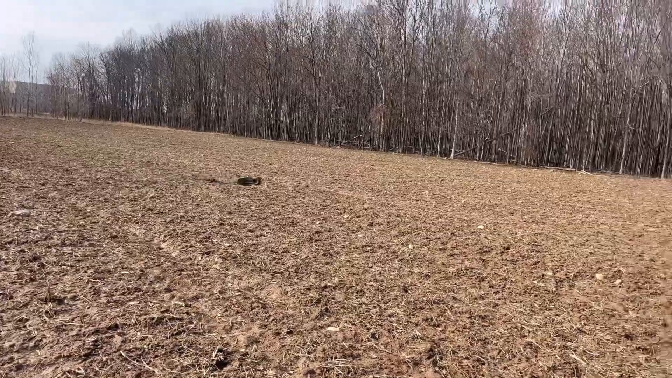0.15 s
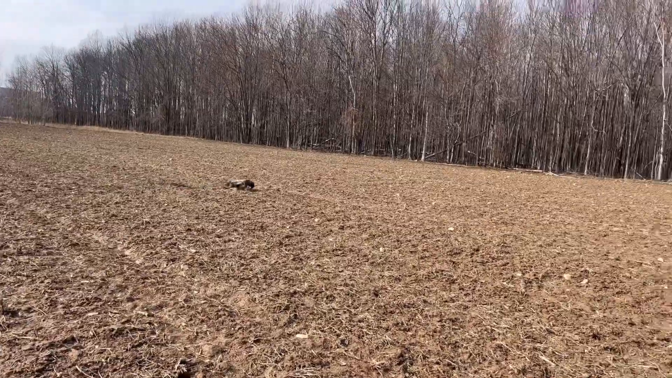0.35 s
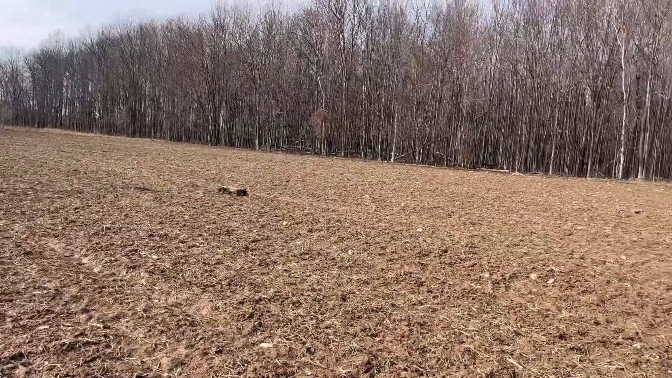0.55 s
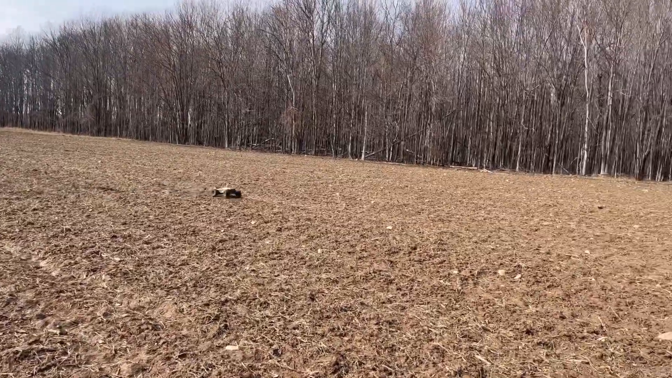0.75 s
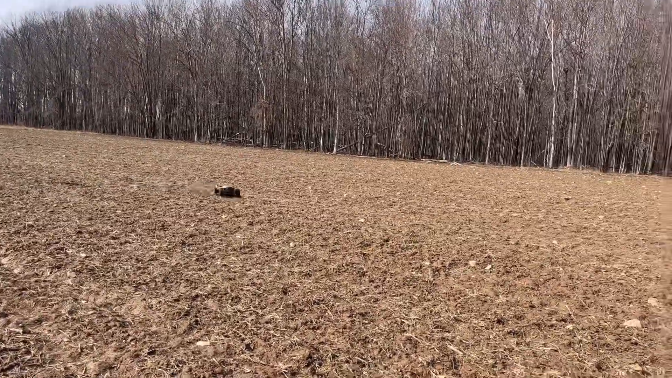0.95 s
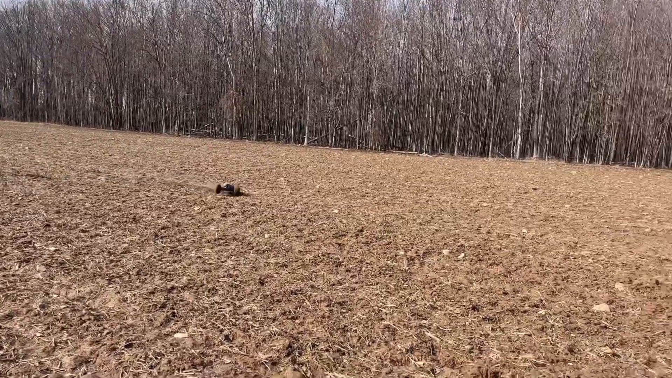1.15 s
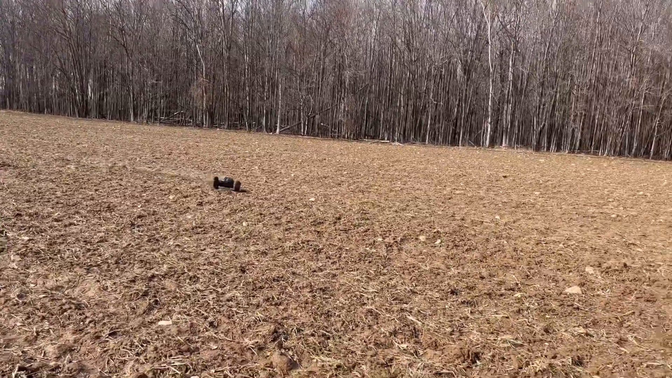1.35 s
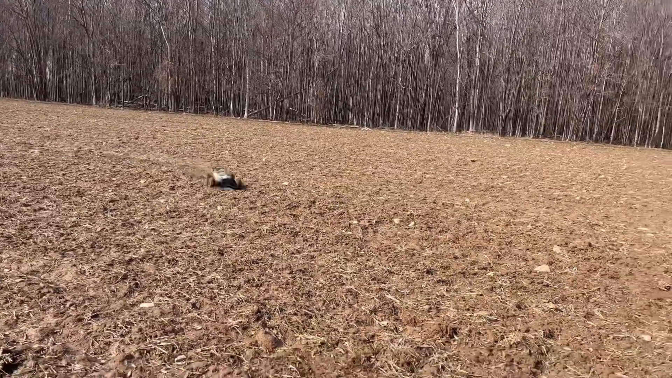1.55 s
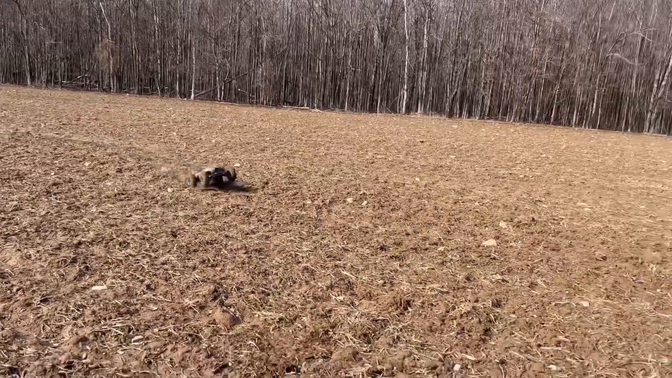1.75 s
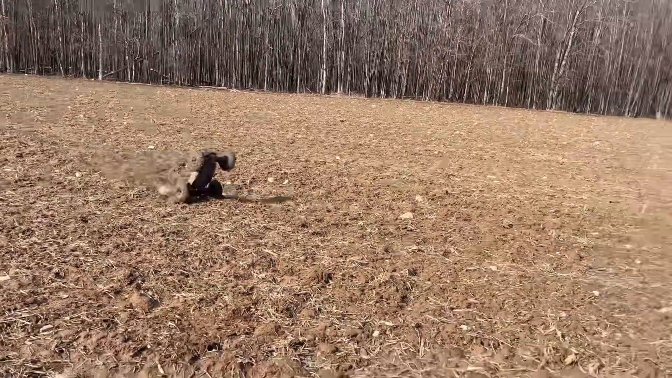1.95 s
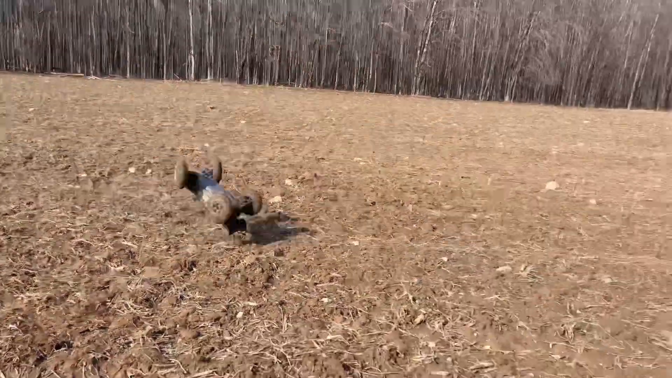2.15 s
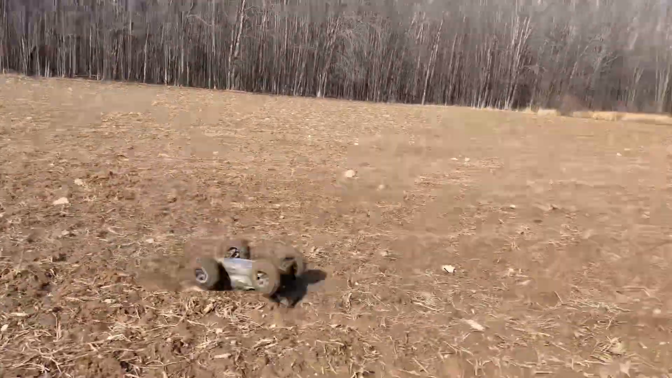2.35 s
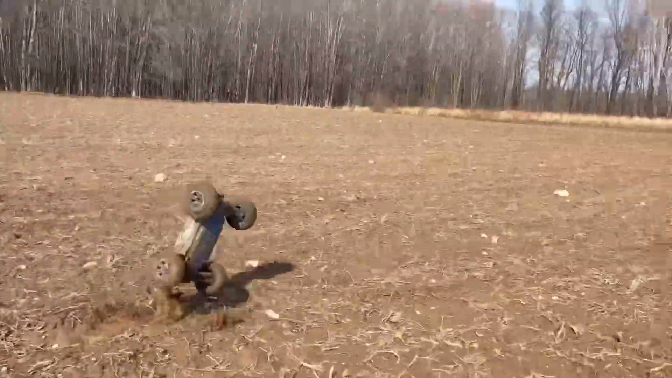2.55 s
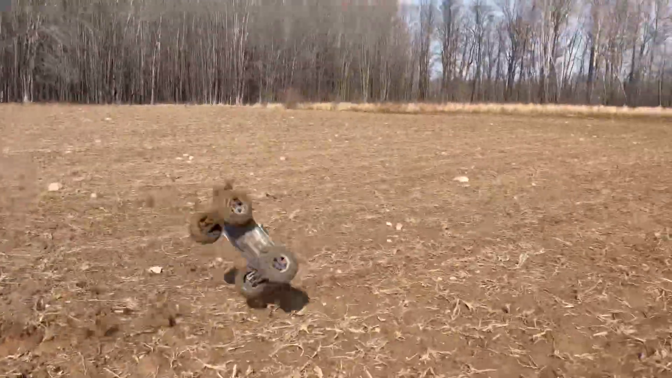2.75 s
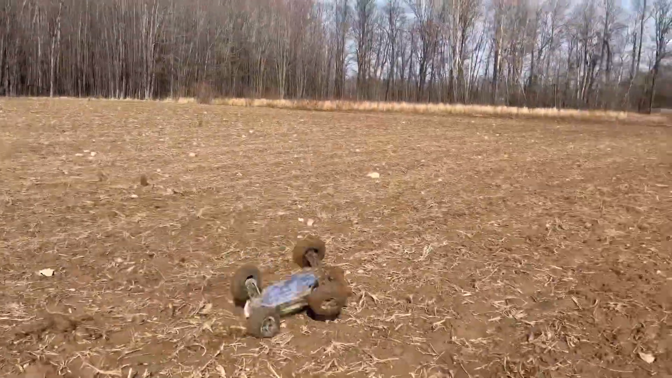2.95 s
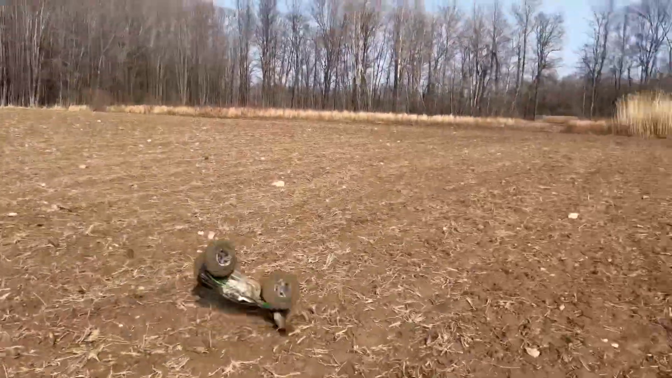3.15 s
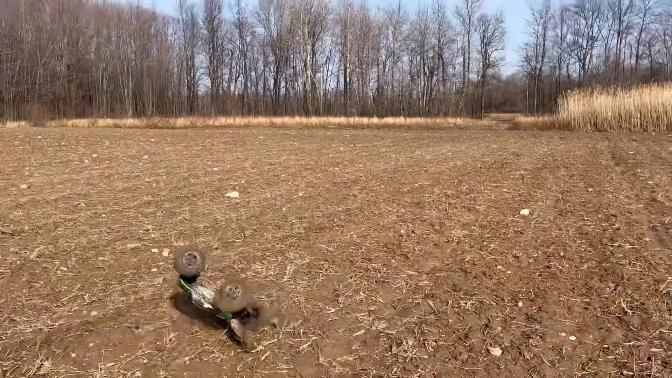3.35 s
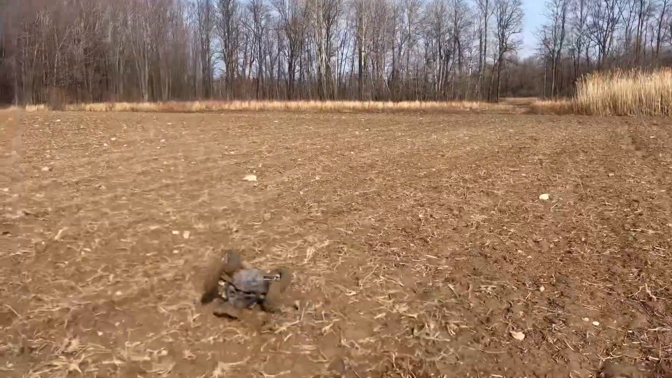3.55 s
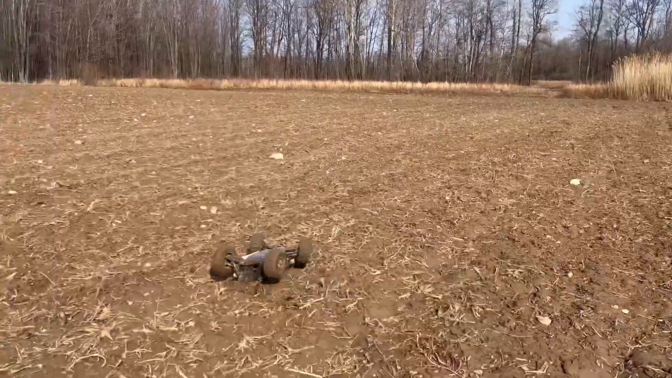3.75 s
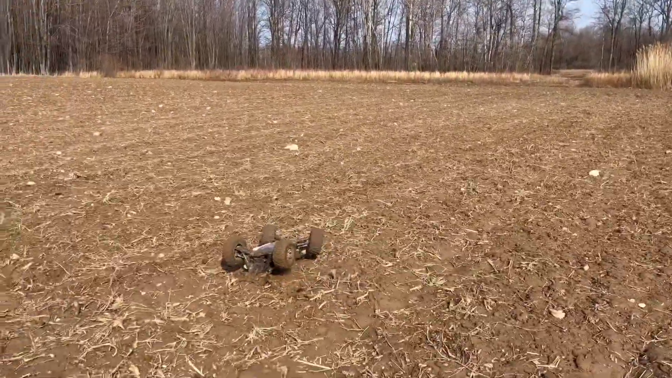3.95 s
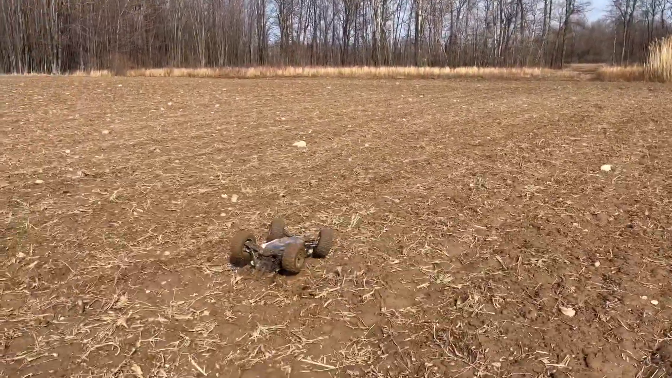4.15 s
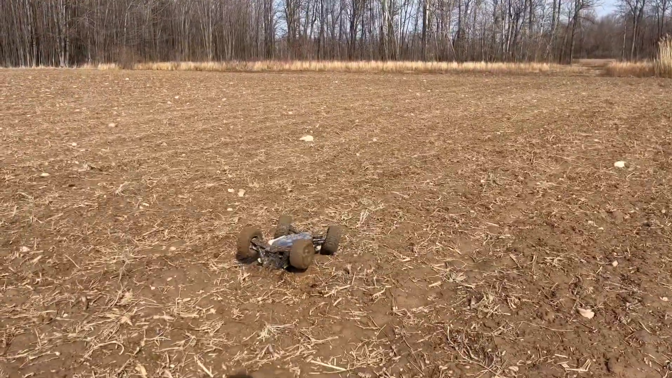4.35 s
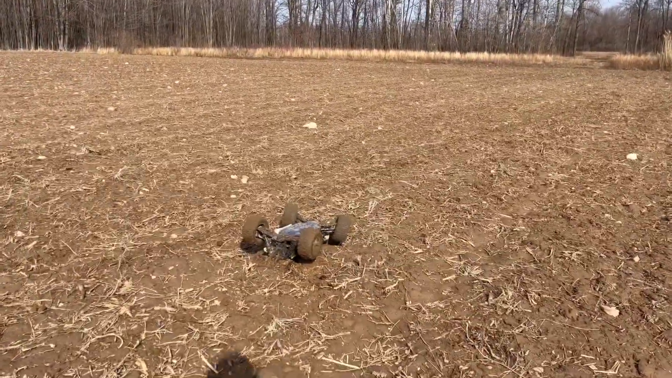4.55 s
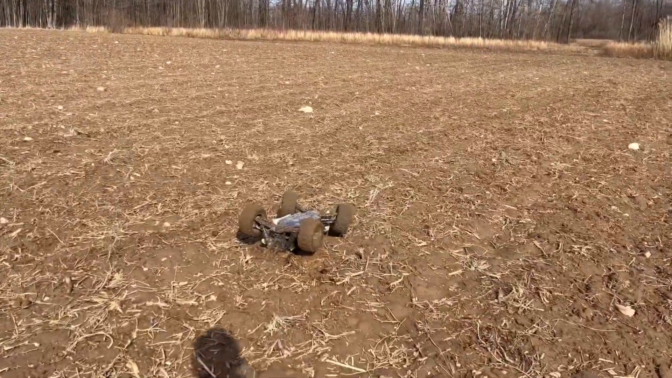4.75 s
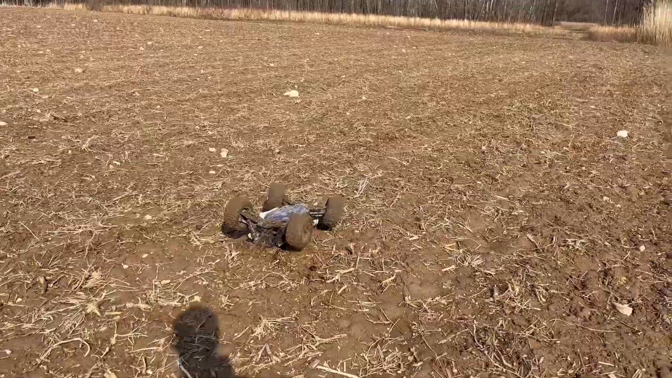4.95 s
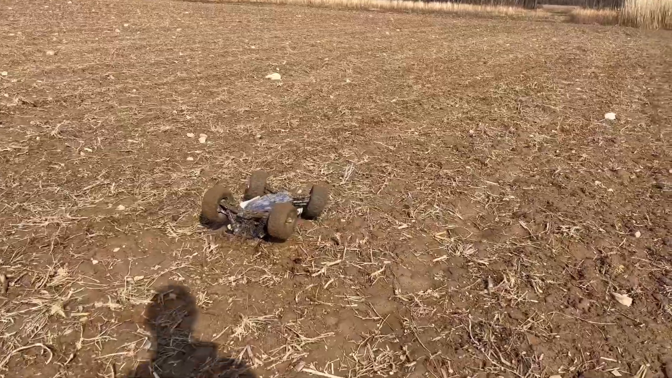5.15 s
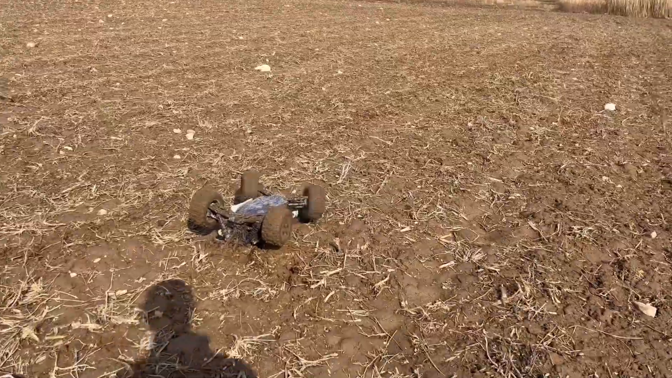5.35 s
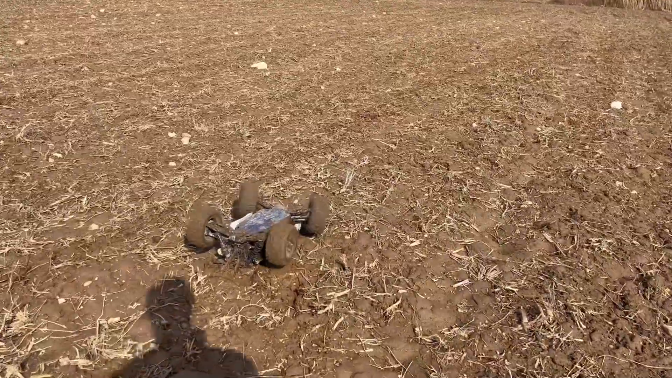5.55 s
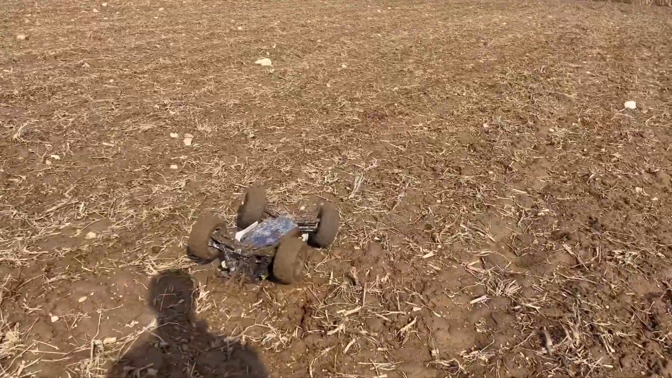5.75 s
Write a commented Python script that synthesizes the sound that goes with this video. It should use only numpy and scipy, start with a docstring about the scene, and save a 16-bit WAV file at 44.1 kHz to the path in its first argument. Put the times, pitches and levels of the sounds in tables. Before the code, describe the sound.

A radio-controlled truck whines closer over dirt, tumbles with crunching thuds, then its wheels rattle and spin down before one last throttle blip.

```python
"""A rising gear whine races closer: a radio-controlled truck crosses a ploughed field, tumbles with
crunching thuds and lands with its wheels spinning, then gets one last blip of throttle.
The whine is the gear mesh following the motor; the rotor hums and the drivetrain rattles the chassis.
Tyres churn and spray soil, grit pings off metal, dry stalks snap and light wind brushes the microphone."""
import sys
import numpy as np
from scipy import signal
from scipy.fft import rfft, irfft
from scipy.io import wavfile
from scipy.ndimage import uniform_filter1d, map_coordinates

SR = 44100
rng = np.random.default_rng(int(sys.argv[2]) if len(sys.argv) > 2 else 0)


def int16_out(signal):
    """Quantize to a 16-bit WAV file."""
    q = np.round(np.clip(np.atleast_2d(signal).T, -1, 1) * 32767)
    wavfile.write(sys.argv[1], SR, q.astype(np.int16))


N = 260190
T = np.arange(N) / SR
BINS = np.fft.rfftfreq(N, 1 / SR)
CRUISE_HZ = 5000  # gear mesh rate at cruising speed

# motor speed through each throttle pull, squeeze to release: one list per pull of (t/s, mesh f/Hz)
PULL_REVS = [
    [(0, 2700), (.025, 2850), (.075, 2300)],
    [(.268, 1550), (.31, 1970), (.345, 2570), (.38, 2730), (.445, 2000)],
    [(.605, 1620), (.65, 2030), (.695, 2020), (.745, 2540)],
    [(.765, 2720), (.84, 2820), (1.17, 4250), (1.27, 5530), (1.375, 6300), (1.42, 5600)],
    [(1.65, 4100), (1.73, 5250), (1.93, 6770), (2.02, 6770)],
    [(2.875, 4400), (2.925, 5380), (2.99, 5110), (3.165, 7250)],
    [(5.343, 850), (5.365, 1200), (5.39, 1720), (5.4, 2420), (5.432, 2300)],
]
# the mix in each pull: whine level/dB, rattle boost/dB, spray boost/dB, churn boost/dB
PULL_MIX = [(-26.5, -2, 14.5, 0.5), (-25, 0, 11.5, 1.5), (-29, 3, 13.5, 2.5), (-24, 1, 11.5, 4),
            (-26.5, 0, 6.5, -0.5), (-27, 4, 4, -1.5), (-26.5, 8, 19, 20)]
# run-downs off the throttle: start/s, end/s, from f/Hz, to f/Hz, bend (over 1 brakes late), hum level/dB
COASTS = [(0.145, 0.24, 1237, 1104, 0.89, -62), (0.491, 0.579, 1314, 1204, 1.36, -60),
          (1.483, 1.628, 3690, 3259, 1.16, -60), (2.053, 2.304, 6360, 5940, 2.17, -20.5),
          (2.604, 2.811, 7257, 6640, 0.93, -24), (3.168, 3.326, 6900, 2914, 2.4, -16.5),
          (3.7, 5.301, 2597, 606.8, 2.15, -64), (5.465, 5.811, 4420, 3857, 1.5, -44)]
# bright, dry hiss of soil and stalks: f/Hz, level/dB
DRY_HISS_EQ = [(1000, -22), (3000, -8), (5000, -5), (7000, -5), (8500, -8), (10500, 0), (13000, 0),
               (14500, 1), (15500, -12)]


def amp(db):
    """Decibels to gain."""
    return 10 ** (np.asarray(db) / 20)


def unit(x):
    """Scales to rms 1."""
    return x / np.sqrt(np.mean(x ** 2) + 1e-20)


def curve(points):
    """Draws (t/s, value) breakpoints at every sample."""
    return np.interp(T, *np.transpose(points))


def across(rows):
    """The columns of a frequency table, at every bin."""
    hz, *columns = np.transpose(rows)
    return [np.interp(np.log(BINS + 1), np.log(hz), c) for c in columns]


def colour(x, eq):
    """Filters through an EQ curve of (f/Hz, level/dB)."""
    return irfft(rfft(x) * amp(across(eq)[0]), N)


def resonance(hz, width_hz):
    """Frequency response of one ringing mode."""
    return 1 / (1 + 1j * (BINS ** 2 - hz ** 2) / (width_hz * BINS + 1e-9))


def wander(rate_hz):
    """Smooth random modulation of rms 1, rolling off above the rate."""
    return unit(irfft(rfft(rng.standard_normal(N)) / (1 + (BINS / rate_hz) ** 4), N))


def grains(per_s, spread_db):
    """Random clicks of uneven size."""
    size = amp(spread_db * np.minimum(rng.exponential(1, N), 4))
    return unit(size * rng.standard_normal(N) * (rng.random(N) < per_s / SR))


def held(start, end, attack_s, release_s):
    """An envelope 0-1: opens around start, holds, and dies away after end."""
    return np.clip((T - start) / attack_s + .5, 0, 1) * np.exp(-np.maximum(T - end, 0) / release_s)


def swell(centre_s, half_s):
    """A bell-shaped envelope 0-1."""
    return np.exp(-((T - centre_s) / half_s) ** 2)


def clumped(x, depth_db, span_hz, span_s):
    """Each clod sounds its own patch of pitches for a moment."""
    spectrogram = signal.stft(x, nperseg=512)[2]
    f, t = np.meshgrid(*map(np.fft.fftfreq, spectrogram.shape), indexing="ij")
    blur = np.exp(-(f * span_hz * 512 / SR) ** 2 - (t * span_s * SR / 256) ** 2)
    patches = unit(np.fft.ifft2(np.fft.fft2(rng.standard_normal(spectrogram.shape)) * blur).real)
    return unit(signal.istft(spectrogram * amp(depth_db * np.clip(patches, -2, 2)))[1][:N])


def flexed(x):
    """Bending plastic and rubber shift their resonances up and down by a few percent."""
    lag_s = .0007 * wander(rate_hz=12)
    return map_coordinates(x, [(T + lag_s) * SR], mode="mirror")


def throttle(sizes, release_s=0.0089):
    """Holds one value per pull while the trigger is squeezed."""
    return sum(size * held(rev[0][0], rev[-1][0], attack_s=.035, release_s=release_s)
               for size, rev in zip(sizes, PULL_REVS))


def motor_hz():
    """The gear mesh rate: driven in each pull, running down in each coast."""
    points = [point for rev in PULL_REVS for point in rev]
    progress = np.linspace(0, 1, num=8)
    for start, end, high, low, bend, _ in COASTS:
        points += zip(start + progress * (end - start), high + (low - high) * progress ** bend)
    return curve(sorted(points))


def ground():
    """How hard the tyres dig: 0 in the air, about 1 in the soil."""
    # tyres on the soil: touch/s, leave/s, dig
    contacts = [(-.1, 2.07, 1.197), (2.119, 2.64, 0.59), (1.269, 1.12, 1.14), (2.317, 2.604, 0.7),
                (2.901, 3.395, 1.037), (3.499, 3.515, 1.05)]
    digs = [dig * held(touch, leave, attack_s=.04, release_s=.17) for touch, leave, dig in contacts]
    return np.max(digs, axis=0)


def nearness(unity_m=3):
    """Sound pressure falls as one over the distance."""
    # the truck's approach: t/s, distance/m
    path = [(0, 17), (1, 19.5), (1.6, 9.22), (2, 3.77), (2.3, 2.86), (2.8, 4.5), (2.94, 1.47), (3.17, 2.46),
            (3.55, 1.57), (4, 2.7), (5.2, 2.74), (5.9, 2.27)]
    return unity_m / curve(path)


def rolling_gain(pull_db, free_db, octave_db, ground_db):
    """A rolling part grows louder with each octave of speed, ground contact, throttle and nearness."""
    speed_db = octave_db * np.log2(motor_hz() / CRUISE_HZ)
    return nearness() * amp(free_db + speed_db + ground_db * ground() + throttle(pull_db))


def wind(calm_db=-42):
    """Lumpy wind on the microphone, swelling in short gusts."""
    # gusts: t/s, half length/s, level/dB
    gusts = [(0.37, 0.088, -36), (0.532, 0.017, -31), (0.684, 0.035, -30), (2.093, 0.62, -34.5),
             (2.195, 0.025, -21.5), (3.026, 0.056, -27), (3.305, 0.36, -35)]
    # low wind rumble: f/Hz, level/dB
    rumble_eq = [(15, -37), (32, -27), (52, 1.5), (100, 0), (170, -8.5), (400, -18), (2000, -42)]
    level = amp(calm_db) + sum(amp(db) * swell(s, half_s) for s, half_s, db in gusts)
    buffeting = amp(-6 + 2 * wander(rate_hz=6.6))
    return level * buffeting * unit(colour(rng.standard_normal(N), rumble_eq))


def stubble(decay_s=0.0014):
    """Dry stalks snap close by."""
    # snaps: t/s, level/dB
    snaps = [(5.168, -44), (5.209, -33.5)]
    envelope = sum(amp(db) * (T >= s) * np.exp(-abs(T - s) / decay_s) for s, db in snaps)
    return envelope * unit(colour(rng.standard_normal(N), DRY_HISS_EQ))


def pings(t60_s=0.024, attack_s=0.0037):
    """Small stones ring a metal part for a moment, each with a dry scratch."""
    # grit on metal: t/s, relative level/dB, f/Hz
    strikes = [(2.226, -23, 11800), (2.254, -20, 10500), (2.289, -19, 12000), (2.668, -17, 14720),
               (2.8088, -19, 10800), (3.3964, -21.5, 11500), (3.441, -24, 14780), (3.572, -23.5, 11400),
               (4.717, -32, 10040), (3.6706, -21.5, 11240), (3.8036, -28, 10470), (4.0183, -21.5, 11900),
               (4.229, -30.5, 10280), (4.7738, -28, 11440), (5.5751, -22.5, 10300), (5.6371, -20, 9700)]
    out, t = np.zeros(N), np.arange(4096) / SR
    for s, db, hz in strikes:
        envelope = amp(db - 60 * t / t60_s) * (1 - np.exp(-t / attack_s))
        ping = envelope * (np.sin(2 * np.pi * hz * t) + rng.standard_normal(len(t)))
        slot = out[round(s * SR):][:len(t)]
        slot += ping[:len(slot)]
    return amp(5) * out


def spray(bumps):
    """Thrown soil hisses against the body, and fine grit tinkles at many high pitches."""
    soil = grains(per_s=7000, spread_db=1) * amp(1.5 * bumps + 4.4 * wander(rate_hz=50))
    hiss = unit(colour(soil, DRY_HISS_EQ))
    grit_spectrum = sum(rfft(grains(per_s=200, spread_db=2)) / (1 + 1j * (BINS - hz) / 200) ** 2
                        for hz in np.linspace(9500, 14500, num=12))
    tinkle = amp(4.5) * unit(irfft(grit_spectrum, N))
    shower = clumped(hiss + tinkle, depth_db=2, span_hz=1200, span_s=0.04)
    boosts_db = [db for _, _, db, _ in PULL_MIX]
    return shower * rolling_gain(boosts_db, free_db=-45, octave_db=8.2, ground_db=7.53)


def tyres(bumps):
    """Lugs slap clods of soft soil and drum the hollow tyres."""
    # dull churn of the tyres: f/Hz, level/dB
    churn_eq = [(25, -49), (90, -8.5), (160, -2), (270, -1.5), (360, -2.5), (490, 2), (590, -4), (710, -10),
                (860, -6.5), (1100, -13.5), (2500, -16), (8000, -48)]
    slaps = grains(per_s=2500, spread_db=-0.5) * amp(bumps)
    churn = clumped(flexed(colour(slaps, churn_eq)), depth_db=3, span_hz=300, span_s=.035)
    boosts_db = [db for *_, db in PULL_MIX]
    return churn * rolling_gain(boosts_db, free_db=-54, octave_db=7.37, ground_db=28.18)


def chassis(clicks):
    """Clicks ring the plastic chassis and shell; some of each click radiates directly."""
    # chassis and shell modes: f/Hz, width/Hz, level/dB
    modes = [(547, 70, 1), (885, 63, 6), (1267, 88, 7.5), (1617, 110, 2), (2000, 57, 1.5), (2360, 78, 4.5),
             (2870, 870, -1.5), (3880, 110, -4.5)]
    # the direct click: f/Hz, level/dB
    click_eq = [(100, -41), (300, -59), (700, -37), (1100, -27), (2000, -11.5), (4100, -43), (4900, -5),
                (9000, -23), (14000, -17)]
    ring = sum(amp(db) * resonance(hz, width) for hz, width, db in modes)
    return irfft(rfft(clicks) * (ring + amp(across(click_eq)[0])), N)


def axles(per_s, spread_db):
    """Each loose part is knocked at its own moments and rings at its own pitch."""
    # modes of wheels, shafts and gear cases: f/Hz, width/Hz, level/dB
    modes = [(537, 98, 0), (829, 85, 1.5), (949, 54, -1.5), (1305, 84, 7), (1360, 170, -1), (1590, 71, 2.5),
             (1712, 60, 2.5), (2090, 195, -0.5), (2356, 144, -2), (2764, 136, 1), (3136, 140, -2),
             (3724, 91, 0), (4166, 125, -3.5)]
    # what gets out past the body shell: f/Hz, level/dB
    leak_eq = [(280, -3), (500, 1), (690, -4), (850, 2.5), (1050, -3), (1270, -1), (4500, 0.5), (5100, 8.5),
               (8000, 8), (14000, 0.5)]
    rings = sum(rfft(grains(per_s, spread_db)) * amp(db) * resonance(hz, width) for hz, width, db in modes)
    return unit(colour(irfft(rings, N), leak_eq))


def rattle(bumps):
    """On the ground, jolts clatter the gears in the chassis; in the air, the slack axles chatter."""
    # loose wheels flop and shake their axles: t/s, half length/s, boost/dB
    flops = [(3.58, 0.014, 4), (3.636, 0.015, 3), (4.691, 0.01, 4), (4.759, 0.028, 7), (4.839, 0.015, 6.5)]
    knocks = flexed(chassis(grains(per_s=7000, spread_db=1.5) * amp(1.1 * bumps)))
    clatter = clumped(knocks, depth_db=3, span_hz=500, span_s=.03)
    flop_db = sum(db * swell(s, half_s) for s, half_s, db in flops)
    chatter = axles(per_s=360, spread_db=1.3) * amp(0.31 * bumps + flop_db)
    airborne = np.clip(1 - ground(), 0, 1)
    blend = np.sqrt(1 - airborne) * clatter + np.sqrt(airborne) * chatter
    boosts_db = [db for _, db, _, _ in PULL_MIX]
    return blend * rolling_gain(boosts_db, free_db=-34, octave_db=5.67, ground_db=4.6)


def judder():
    """The motor hammers the axles as it pulls from low speed."""
    # bursts of judder: start/s, end/s, level/dB
    bursts = [(0.263, 0.306, -25.5), (0.589, 0.69, -30.5), (5.337, 5.383, -24.5)]
    # their tone: f/Hz, level/dB
    judder_eq = [(550, -16), (800, -2), (1500, 3), (2500, 3.5), (3900, 11), (5200, -28), (9000, 7)]
    level = sum(amp(db) * held(start, end, attack_s=0.023, release_s=0.011) for start, end, db in bursts)
    hammer = axles(per_s=170, spread_db=0.5)
    return level * nearness() * unit(colour(hammer, judder_eq))


def crunches(attack_s=0.0024):
    """Each landing, or a clod striking the body, is a short crunch: a thud in tyres and shell, a crack in the
    chassis."""
    # hard hits on the chassis, from landings and one clod of soil striking the truck: t/s, level/dB, 40 dB
    # decay/s, crack trim/dB
    hits = [(2.124, -18.5, 0.11, -11.5), (2.321, -8, 0.05, -9), (2.337, -9.5, 0.094, -14.5),
            (2.362, -8, 0.06, -19), (2.375, -15.5, 0.054, -11), (2.388, -14.5, 0.036, -8),
            (2.407, -6, 0.1, -21.5), (2.863, -24, 0.11, -2), (2.994, -1, 0.054, -23),
            (3.044, -4.5, 0.057, -16), (3.157, -10, 0.067, -10.5), (3.537, -24.5, 0.13, -6.5)]
    # body of the thud: f/Hz, level/dB
    thud_eq = [(25, -21), (150, 6.5), (330, 5.5), (520, 12), (760, -1.5), (1100, -12), (3000, -74),
               (9000, -55)]
    thud_level, crack_level = np.zeros((2, N))
    for s, db, decay_s, crack_db in hits:
        age = np.maximum(T - s, 0)
        force = amp(db - 40 * age / decay_s) * (1 - np.exp(-age / attack_s))
        thud_level += force
        crack_level += force * amp(crack_db)
    # rubber and soil give way, which soft-clips the thud
    thud = np.tanh(0.55 * unit(colour(rng.standard_normal(N), thud_eq)))
    crack = amp(7) * unit(chassis(rng.standard_normal(N)))
    return thud_level * thud + crack_level * crack


def slams(attack_s=.0075):
    """The hardest landings bottom out the tyres and make the hollow shell boom for a few cycles."""
    # hardest landings: t/s, peak level/dB
    hits = [(2.3231, -1.5), (2.4225, -11), (3.05, -9.5), (3.161, -15)]
    # shell and tyre modes: f/Hz, level/dB, t60/s
    modes = [(314, -3.5, 0.048), (474, 1.5, 0.057), (775, -3.5, 0.055), (1200, -12, 0.054)]
    out, t = np.zeros(N), np.arange(4096) / SR
    attack = np.sin(np.pi / 2 * np.minimum(t / attack_s, 1)) ** 2
    boom = attack * sum(amp(db - 60 * t / t60) * np.sin(2 * np.pi * hz * t) for hz, db, t60 in modes)
    for s, db in hits:
        out[round(s * SR):][:len(t)] += amp(db) * boom / abs(boom).max()
    return out


def rotor_hum(pinion_teeth, jitter=0.00502, flutter_db=2.5):
    """The unbalanced rotor shakes the chassis once a turn: evenly in the air, unsteadily in the soil."""
    coasting = sum(amp(db) * held(start, end, attack_s=0.076, release_s=0.0083)
                   for start, end, *_, db in COASTS)
    driven = amp(-25) * throttle(np.ones(len(PULL_REVS))) * (motor_hz() / CRUISE_HZ) ** 2
    waver = 1 + jitter * (1 + 15 * ground()) * wander(rate_hz=68.9)
    phase = 2 * np.pi * np.cumsum(motor_hz() / pinion_teeth * waver) / SR
    flutter = amp(-11 + flutter_db * wander(rate_hz=22))
    return (coasting + driven) * flutter * nearness() * np.sqrt(2) * np.sin(phase)


def gear_whine(pinion_teeth, jitter=0.018, harmonics_db=(0, -12, -17), wobble=0.094, axle_ratio=.39):
    """Meshing teeth sing a flickering tone, smeared at top speed and under hard acceleration."""
    # how strongly the gearbox radiates: f/Hz, level/dB
    gearbox_eq = [(700, -2), (1900, -5.5), (2350, -6), (2800, -1), (3200, -4.5), (3600, -11), (4200, -14.5),
                  (5250, -4), (5650, -6.5), (6250, -2.5), (6850, -5), (7500, -30), (8500, -20.5),
                  (10500, 3.5), (14000, 4), (17000, -60)]
    hz = motor_hz()
    speed = hz / hz.max()
    racing = speed ** 4
    # torque on the teeth follows how fast the motor gathers speed (0-1)
    strain = np.clip(uniform_filter1d(np.gradient(np.log(hz)), size=900) * SR / 12, 0, 1)
    flicker_db = (3.6 + 1.8 * racing) * wander(rate_hz=45)
    level = throttle([amp(db) for db, *_ in PULL_MIX], release_s=0.0025) * nearness() * amp(flicker_db)
    waver = 1 + jitter * np.sqrt(hz / CRUISE_HZ) * wander(rate_hz=71)
    phase = 2 * np.pi * np.cumsum(hz * waver) / SR
    # the off-centre pinion presses harder once a turn: side tones flank the whine
    press = 1 + wobble * speed * (wander(rate_hz=11) + 1) * np.cos(phase / pinion_teeth)
    # each harmonic is part pure tone, part noise skirt; reading the noise faster widens the skirt
    rough = np.clip(.38 + .8 * racing + .25 * strain, 0, .9)
    skirt_hz = 130 + 600 * racing + 110 * strain
    playhead = np.cumsum(skirt_hz) / 1000
    mesh = np.zeros(N)
    for k, db in enumerate(harmonics_db, 1):
        noise_cos, noise_sin = (np.interp(k * playhead, np.arange(N), wander(rate_hz=1000), period=N)
                                for _ in range(2))
        skirt = noise_cos * np.cos(k * phase) + noise_sin * np.sin(k * phase)
        tone = (1 - rough) * np.cos(k * phase) + rough * skirt
        tone /= np.sqrt((1 - rough) ** 2 / 2 + rough ** 2)
        bite_db = 10 * strain * np.log(k)
        radiated_db = np.interp(k * hz, *np.transpose(gearbox_eq))
        mesh += amp(db + bite_db + radiated_db) * tone
    # the axle gears mesh more slowly and add a lower tone
    axle_tone = amp(-10) * speed * (1 + 0.26 * wander(rate_hz=73)) * np.cos(axle_ratio * phase)
    return level * press * (mesh + axle_tone)


def stereo_image(direct, shared, scattered, ahead_share=0.51):
    """Stereo width: left-right phase, coherence and balance vary with frequency."""
    # stereo width: f/Hz, left phase lead/rad, coherence, left minus right/dB
    width = [(60, 0, .9, 0), (500, .3, .96, -.8), (1100, .55, .85, 1.2), (2300, 1.1, .75, .3),
             (3800, 2.3, .65, 4), (5100, 2.5, .55, 4), (6400, 2.8, .5, 0), (8200, 3.1, .9, .3),
             (9700, 1.7, .62, -1), (11300, 0, .95, 0), (12800, -.2, .93, 0), (13800, -1.7, .85, 0),
             (14500, -2.5, .8, 0)]
    # the left lead shrinks as the truck comes to rest straight ahead: t/s, crossfade 0-1
    settling = [(3.0, 0), (4.2, 0.52)]
    lead, coherence, balance_db = across(width)
    mid = rfft(direct) + np.sqrt((1 + coherence) / 2) * rfft(shared)
    side = np.sqrt((1 - coherence) / 2) * rfft(scattered)
    tilts = (amp(balance_db / 2) * np.exp(.5j * lead * share) for share in (1, ahead_share))
    aside, ahead = (irfft(np.array([(mid + side) * tilt, (mid - side) / tilt]), N) for tilt in tilts)
    return aside + curve(settling) * (ahead - aside)


def scene(pinion_teeth=12):
    """The same jolts shake rattle, tyres and spray; the noisy layers are drawn twice for stereo width."""
    bumps = unit(wander(rate_hz=20.3) + 0.13 * wander(rate_hz=87))
    shared, scattered = (
        gear_whine(pinion_teeth) + rattle(bumps) + judder() + tyres(bumps) + spray(bumps) + wind()
        for _ in range(2))
    direct = rotor_hum(pinion_teeth) + slams() + crunches() + pings() + stubble()
    return stereo_image(direct, shared, scattered)


def record(dry):
    """A steep low-pass trims the highest treble."""
    lowpass = signal.firwin(301, cutoff=15800, window=("kaiser", 9), fs=SR)
    return signal.oaconvolve(dry, lowpass[None], "same")


dry = scene()
out = record(dry)
int16_out(out)
```